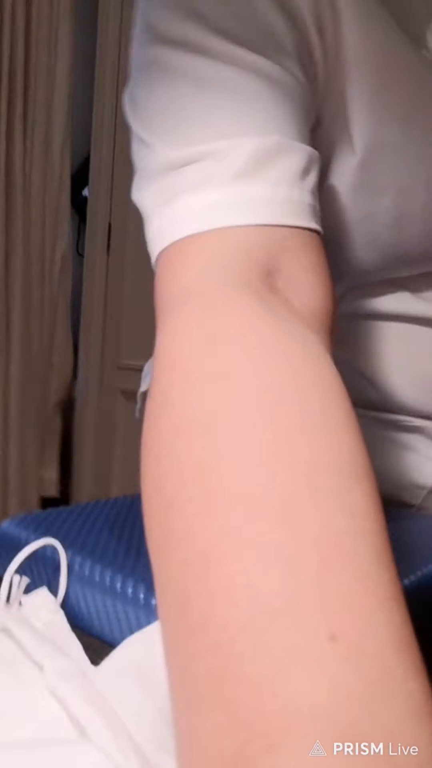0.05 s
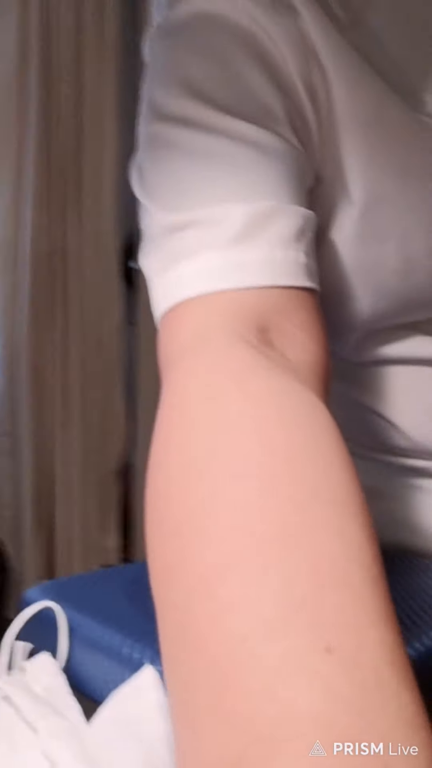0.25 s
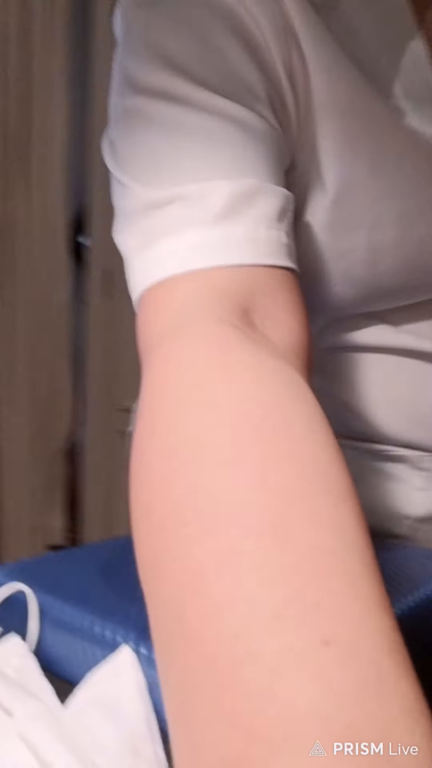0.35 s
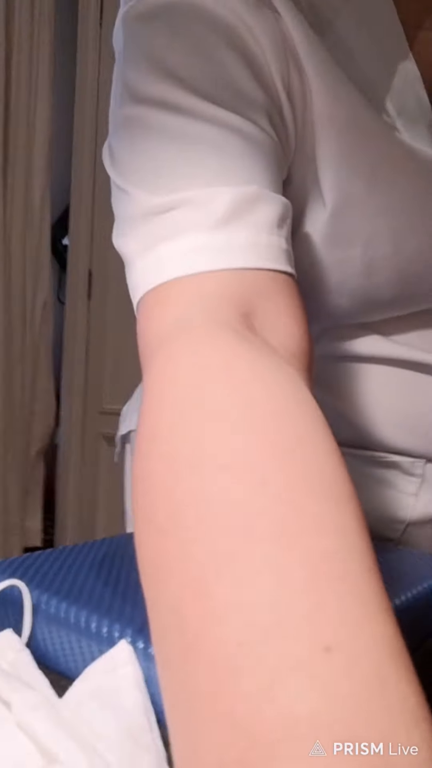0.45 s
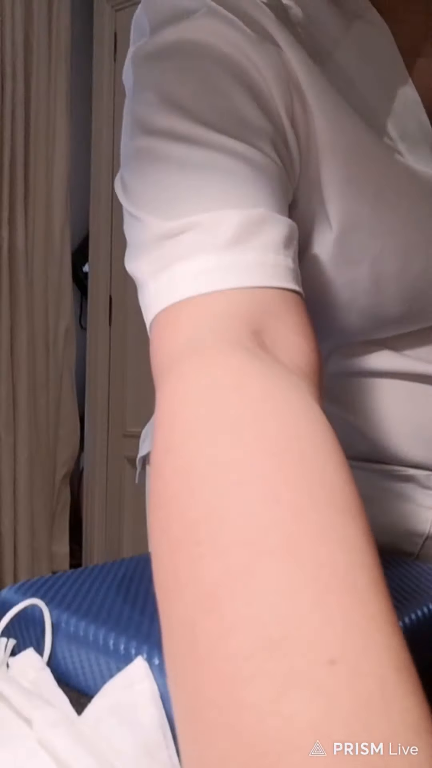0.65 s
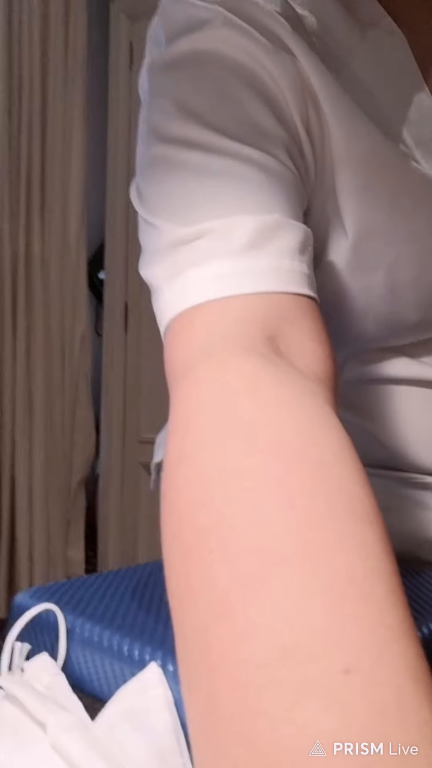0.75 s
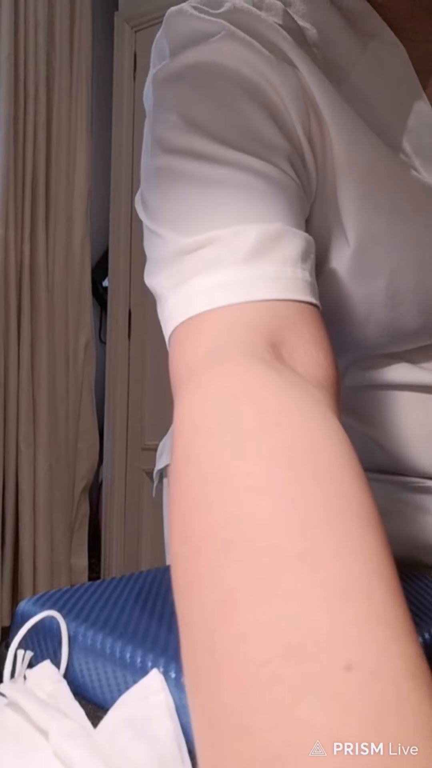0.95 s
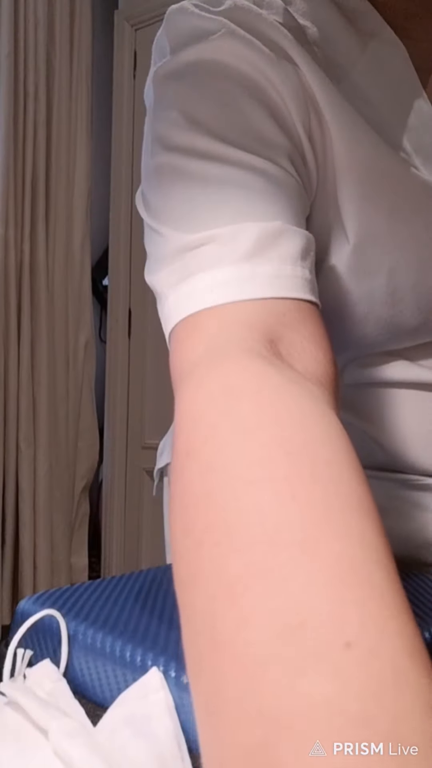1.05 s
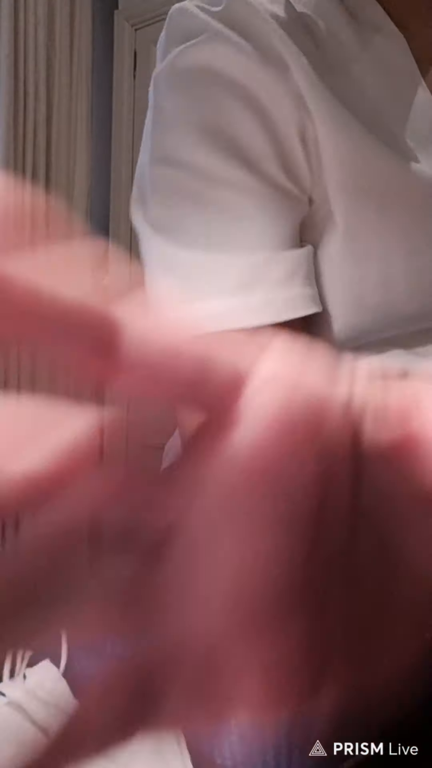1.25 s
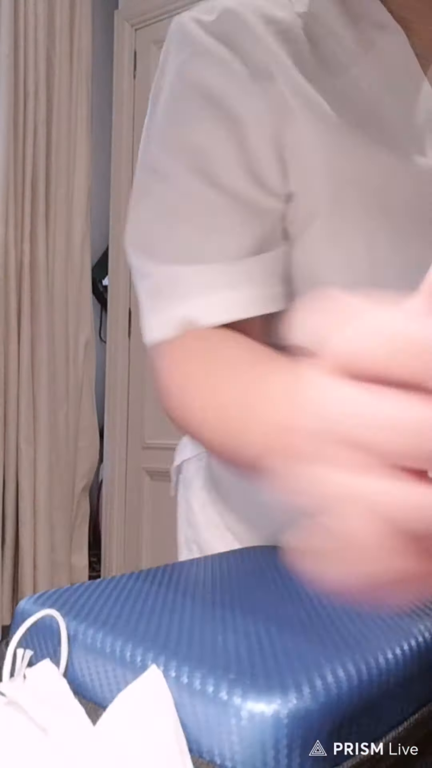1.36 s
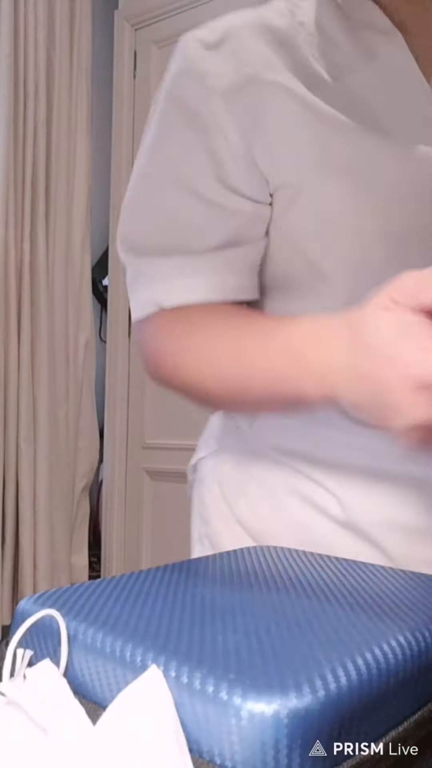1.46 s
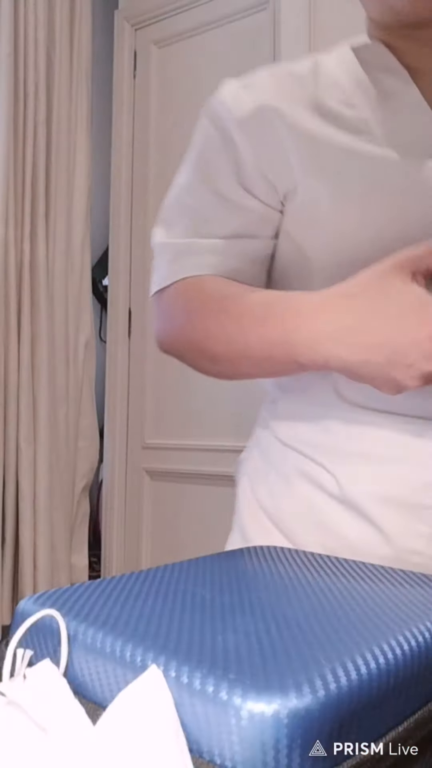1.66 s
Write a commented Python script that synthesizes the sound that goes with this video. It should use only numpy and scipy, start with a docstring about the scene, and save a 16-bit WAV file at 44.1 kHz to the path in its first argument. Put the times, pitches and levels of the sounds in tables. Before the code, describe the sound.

Handling noise in a quiet bedroom, very close stereo microphone. Faint touches, then at 0.14 s a violent overloaded knock with a crack, brief high squeak and faint metallic ring. From 0.2 to 0.6 s low rumble, skin rubbing and dry ticks, mostly left, with a short scrape near 0.44. A weaker clunk at 0.72, slight cloth rustle at 0.83, then hush with hiss, tiny ticks and soft hand pats around 1.53.

```python
"""Handling noise in a quiet bedroom

A hand adjusts a camera on its metal stand. Bumps excite damped modes of the casing and, faintly, of the stand;
fingers slide and tick beside the left microphone port as grainy noise and short resonances.
The grip lets go with a snap, clothes rustle as shaped noise while the arm draws back,
and the hands meet in a few light pats, decaying noise bursts. Low hum and hiss lie beneath.
"""
import sys
import numpy as np
from scipy.fft import rfft, irfft, next_fast_len
from scipy.io import wavfile
from scipy.ndimage import map_coordinates

SR = 44100
rng = np.random.default_rng(int(sys.argv[2]) if len(sys.argv) > 2 else 0)


def wrap_up_sound(samples):
    """Save the sound to the file named by the first command line argument, as 16-bit audio."""
    columns = np.atleast_2d(samples).T
    # keep every value between -1 and 1, then stretch to whole-number steps
    tamed = np.clip(columns, -1, 1)
    steps = np.round(tamed * 32767).astype(np.int16)
    wavfile.write(sys.argv[1], SR, steps)


N = 74970

# All levels are relative; pan_db is left minus right.
# Bumps on the casing: start_s, level_db, contact_ms (centre to peak of the push), pan_db
CASING_BUMPS = [(0.015, -39, 1.1, 18), (.081, -31, 0.51, 0.5), (0.14, 1, 0.73, 11.5),
                (0.1548, -7.5, 0.97, 11), (.1625, -18.5, 0.75, 12), (0.2193, -27, 1.75, 15.5),
                (.229, -19, 1.27, 13.5), (.266, -29, 1.9, 16), (0.286, -31.5, 1.27, 18),
                (.399, -27.5, 1.82, 8), (0.415, -35.5, 0.97, -13.5), (.441, -29, 1.55, -7.5),
                (.468, -30, 1.37, -5.5), (0.588, -32, 1.97, 20.5), (.597, -31.5, 0.88, 2),
                (0.7258, -17.5, 1.05, -9.5), (0.733, -29, 2.5, 7), (.748, -37.5, 2.1, -30.5),
                (0.76, -31, 1.8, 8), (0.808, -41, 2.3, 6), (1.009, -47.5, 2.1, 18)]
# Modes of the casing in its clamp: pitch_hz, level_db, t60_s, pan_db
CASING_MODES = [(79.4, -22.5, 0.11, 3), (131, -19, 0.083, 5), (223.8, -17.5, 0.22, 2),
                (270, -21, 0.08, -0.5), (349.2, -10, 0.053, -3), (430.6, -11.5, .055, -8),
                (470, -18.5, 0.03, -4.5), (566.3, -22.5, 0.17, -0.5), (612, -17.5, 0.059, -18.5),
                (723, -13.5, 0.089, 6), (790, -25.5, 0.037, -13.5), (876, -20.5, .05, 0.5),
                (1036, -27.5, 0.067, 2.5), (1760, -13.5, 0.011, 2)]
# Cracks and rattles of the clamp: start_s, crack_db, crack_pan_db, rattle_db, rattle_pan_db
CLAMP_BLOWS = [(.1402, -9.5, 1.5, -35, -3.5), (0.7224, -12.5, -19.5, -30, -2.5)]
# Spectrum of crack and rattle: frequency_hz, level_db
RATTLE_SPECTRUM = [(300, -6.5), (1000, -1.5), (2000, 0), (3200, -4), (4500, -1.5), (6000, -2), (8500, 0),
                   (12000, -9), (16000, -12)]
# Jolts that ring the stand: start_s, level_db, most_excited_hz, spread_octaves
STAND_JOLTS = [(0.0, -45, 1740, 0.38), (0.142, -35.5, 1140, 0.28), (0.7252, -45, 2700, 1.05)]
# Modes of the stand: pitch_hz, level_db, t60_s, pan_db
STAND_MODES = [(735, 1, .16, 10), (1240, 2, 0.41, 5), (1504, -9.5, .3, 14), (1820, -15, 0.27, 10.5),
               (2232, -16.5, 0.32, 2.5), (2400, -15, 0.28, 8.5), (2703, -4, 0.19, 4),
               (2902, -14.5, 0.2, 4.5), (3680, -9, .2, 2), (4415, -17.5, 0.51, 1), (5200, -18, .12, -2),
               (7200, -10.5, 0.079, 0)]
# Ticks of skin and nail on the casing: start_s, level_db, centre_hz, pan_db, tail_db
SKIN_TICKS = [(.079, -36.5, 527, 12, -3), (.107, -45, 2880, 12.5, -8), (0.213, -26, 9600, 25, -19),
              (0.217, -24.5, 9400, 34.5, -21), (.286, -24, 4370, 11, -36), (0.321, -23, 9000, 14, -40),
              (0.331, -32, 10200, 12, -33), (0.3686, -26, 9300, 20, -29), (0.3924, -35, 9450, 33, -20),
              (.442, -20, 2400, 25.5, -22), (0.458, -25.5, 9000, 10, -19), (0.533, -46.5, 1920, 10, -15),
              (.5735, -31.5, 9050, 10.5, -30), (0.646, -30, 13500, 12.5, -39), (.651, -44.5, 517, -11, -16),
              (.675, -47, 510, -17, -14), (.7448, -34, 2580, -13, -7), (1.136, -42, 9130, 15, -23),
              (1.2384, -42.5, 8700, 7, -7), (1.421, -43.5, 9000, -8, -5.5), (1.5326, -38.5, 8550, 20, -33),
              (1.561, -37, 8500, 7, -31), (1.692, -33.5, 9150, 0, -26)]
# Finger strokes by the left port: start_s, length_s, level_db, slope_db_per_s, release_s
FINGER_STROKES = [(0.144, .008, -35, -100, 0.025), (0.206, 0.027, -25.5, -47, 0.0046),
                  (0.225, 0.0984, -28.5, -32, 0.0093), (0.355, 0.12, -33.5, -30, 0.011),
                  (0.483, 0.12, -49.5, -42, 0.012), (0.577, 0.023, -39.5, 42, 0.0057),
                  (0.69, 0.011, -50, 14, .006), (0.805, 0.037, -36, 92, 0.0086)]
# Spectrum of sliding skin: frequency_hz, level_db
SKIN_SPECTRUM = [(200, -0.5), (500, -8.5), (900, -28.5), (1800, -23.5), (3200, -16.5), (5500, -12),
                 (8800, 0), (12000, -9.5), (16000, -12.5)]
# The fingertip drags harder just before it slips: time_s, level_db
DRAG_LEVEL = [(.36, -95), (.39, -70), (.42, -55), (.44, -46.5), (.455, -59), (.52, -84), (.58, -110)]
# Spectrum of the drag: frequency_hz, level_db
DRAG_SPECTRUM = [(400, -20), (1000, -3), (1900, -1), (2900, -3), (4500, -10.5), (9000, -24)]
# Rumble of the holding hand: time_s, level_db, pan_db
GRIP_LEVEL = [(0, -56, 18), (.11, -60.5, 15), (.2, -35, -1), (.29, -37, 13), (.35, -50.5, 7),
              (0.419, -41.5, 10), (.48, -41.5, 3), (.54, -52, 5.5), (.61, -44.5, 12), (.68, -59.5, 19),
              (.83, -54.5, 10), (.92, -61.5, 12), (1.1, -71, 1.5), (1.7, -77.5, -2)]
# Spectrum of the rumble: frequency_hz, level_db
RUMBLE_SPECTRUM = [(20, -13.5), (45, -1.5), (120, 1), (260, -4), (380, -14), (600, -30.5), (900, -31),
                   (1500, -37), (4000, -50.5)]
# Rustle of the shirt: time_s, level_db
SLEEVE_LEVEL = [(0, -60), (.65, -62.5), (.79, -60), (.83, -45.5), (.875, -57), (.92, -62), (1.05, -67.5),
                (1.33, -67), (1.43, -60.5), (1.52, -58), (1.57, -57), (1.63, -63), (1.7, -68.5)]
# Spectrum of the cloth: frequency_hz, level_db
CLOTH_SPECTRUM = [(100, -13.5), (400, 5), (900, -1.5), (2000, -10), (4500, -5.5), (7000, -4), (8800, 1),
                  (12000, -11), (16000, -10.5)]
# Soft pats of the hands: start_s, level_db, pan_db
HAND_PATS = [(0.823, -61, 18), (0.871, -54.5, 22), (1.421, -72, -3), (1.531, -42.5, 5), (1.553, -46.5, 8),
             (1.56, -49, -7)]
# Spectrum of the palms: frequency_hz, level_db
PALM_SPECTRUM = [(100, -1), (400, 4.5), (800, 1), (1400, -5), (2500, -7.5), (4000, -22), (6500, -23),
                 (8600, -1.5), (11000, -13), (16000, -16)]
# Spectrum of the low room tone: frequency_hz, level_db
HUM_SPECTRUM = [(12, -47.5), (20, -11.5), (75, 0), (120, -6.5), (146, -23.5), (188, -0.5), (213, -12),
                (275, -9), (416, -21.5), (464, -30.5), (1500, -37.5), (1950, -61), (3300, -120)]
# Narrow bands of room hum: centre_hz, wobble_knots_per_s (sets the width), level_db
HUM_BANDS = [(112, 4.7, -71.5), (195, 17, -70), (273, 7.3, -70.5)]
# Spectrum of the microphone hiss: frequency_hz, level_db
HISS_SPECTRUM = [(710, -39.5), (1200, -13.5), (2560, -16.5), (2950, -18), (3400, -15.5), (5300, -14.5),
                 (5970, -13), (8630, -3), (16000, -13)]
# Slow changes of the hiss: time_s, level_db
HISS_LEVEL = [(0, 0.5), (.6, 6.5), (.78, -22), (.9, 1), (1.05, -1.5), (1.2, 3.5), (1.28, -0.5), (1.55, 7.5),
              (1.66, -3)]

CASING_DB, SOFT_HZ_MS = -3.5, 351.9  # ring against push; corner frequency times contact time
PORT_LAG_S, MODE_LAG_RAD = 0.00031, 0.6  # the right port moves a little after the left
RATTLE_DECAY_S = 0.018
SQUEAK_S, SQUEAK_HZ, SQUEAK_DB, SQUEAK_RISE_S = 0.14, 8205, 4, 0.00044
SQUEAK_BEND = 0.13  # share of its pitch by which the squeak starts high
TICK_BANDWIDTH = 0.395  # share of the centre frequency
CRACK_S, GRIT_S = 0.0003, 0.003  # decay times
STROKE_ATTACK_S, STROKE_LEAK_DB = 0.0064, -20.5  # leak: level at the right port
GRAINS_PER_S, GRAIN_SHARE = 2100, 0.65
PAT_DECAY_S, ROOM_DECAY_S, ROOM_GAIN = 0.0046, 0.016, 0.238265
HUM_DB, HISS_DB, HISS_PAN_DB = -62, -62, 5
CLIP_LEVEL, TOP_HZ = 0.9, 16050  # output ceiling; upper band limit


def amp(db):
    """Decibel law: gain is ten to the level over twenty."""
    return 10 ** (np.asarray(db) / 20)


def unit(x):
    """Normalisation by the root mean square."""
    return x / np.sqrt(np.mean(x ** 2) + 1e-20)


def since(s):
    """Elapsed time: seconds since s, zero before it."""
    return np.maximum(np.arange(N) / SR - s, 0)


def decay(s, life):
    """Exponential decay that starts at s, with time constant life."""
    return (since(s) > 0) * np.exp(-since(s) / life)


def sides(db):
    """Level difference between the ears, split evenly into left and right gains."""
    return amp(np.array([[db], [-db]]) / 2)


def curve(rows):
    """Envelope: gain per sample, linear in decibels between (s, dB) points."""
    return amp(np.interp(np.arange(N) / SR, *np.transpose(rows)))


def filtered(x, response):
    """Linear filtering: the spectrum of x times a response of frequency."""
    m = next_fast_len(N + SR // 2)
    spectrum = rfft(x, m) * response(np.fft.rfftfreq(m, 1 / SR))
    return irfft(spectrum, m)[..., :N]


def coloured(x, points):
    """Spectral shaping of x by (Hz, dB) points, at rms 1."""
    f, db = np.transpose(points)
    return unit(filtered(x, lambda hz: amp(np.interp(np.log(hz + 1), np.log(f + 1), db))))


def noise(points, shared):
    """Partial coherence: stereo noise whose shared power is common to both ports."""
    z = rng.standard_normal((3, N))
    return coloured(np.sqrt(shared) * z[2] + np.sqrt(1 - shared) * z[:2], points)


def wobble(rate):
    """Slow fluctuation: a smooth random curve with rate knots a second."""
    knots = rng.standard_normal(int(N * rate / SR) + 4)
    return map_coordinates(knots, [np.arange(N) * rate / SR])


def ring(s, hz, t60):
    """Damped oscillation of one mode struck at s."""
    return amp(-60 * since(s) / t60) * np.sin(2 * np.pi * hz * since(s))


def bumps():
    """Impact excitation: a push out and back rings the casing; longer contact excites less treble."""
    out = np.zeros((2, N + SR))
    t = np.arange(SR // 5) / SR
    right = np.array([[0], [1]])
    modes = []
    for hz, db, t60, pan in CASING_MODES:
        lag = right * MODE_LAG_RAD * np.minimum(hz * t, 1)  # builds up over the first cycle
        wave = np.sin(2 * np.pi * hz * t - lag)
        modes.append((hz, amp(db - 60 * t / t60) * sides(pan) * wave))
    for s, db, contact_ms, pan in CASING_BUMPS:
        u = (np.arange(N) / SR - s - right * PORT_LAG_S) * 1000 / contact_ms
        push = u * np.exp((1 - u * u) / 2)
        body = sum(mode / np.hypot(1, hz * contact_ms / SOFT_HZ_MS) for hz, mode in modes)
        out[:, :N] += amp(db) * sides(pan) * push
        out[:, round(s * SR):][:, :len(t)] += amp(db + CASING_DB) * sides(pan) * body
    return out[:, :N]


def clamp():
    """Impulse and scatter: each sharp blow gives one crack, then a brief bright rattle."""
    out = np.zeros((2, N))
    for s, crack_db, crack_pan, rattle_db, rattle_pan in CLAMP_BLOWS:
        impulse = 1.0 * (np.arange(N) == round(s * SR))
        crack = coloured(impulse, RATTLE_SPECTRUM)
        rattle = decay(s, RATTLE_DECAY_S) * noise(RATTLE_SPECTRUM, shared=0.037)
        out += amp(rattle_db) * sides(rattle_pan) * rattle
        out -= amp(crack_db) * sides(crack_pan) * crack / crack.max()
    return out


def stand():
    """Modal ringing: the metal stand sounds on after a jolt, which favours one region of its modes."""
    out = np.zeros((2, N))
    for s, level, centre, spread in STAND_JOLTS:
        for hz, db, t60, pan in STAND_MODES:
            favour = 1 / (1 + (np.log2(hz / centre) / spread) ** 4)
            out += amp(level + db) * favour * sides(pan) * ring(s, hz, t60)
    return out


def squeak():
    """Cavity resonance: air squeezed through the right port rings it briefly; the pitch falls into place."""
    t = since(SQUEAK_S)
    u = t / SQUEAK_RISE_S
    cycles = SQUEAK_HZ * (t + SQUEAK_BEND * SQUEAK_RISE_S * (1 - np.exp(-u)))
    return amp([[SQUEAK_DB - 25], [SQUEAK_DB]]) * u * np.exp(1 - u) * np.sin(2 * np.pi * cycles)


def ticks():
    """Heavily damped resonance: tiny contacts with a broad resonance, a crack and a short gritty tail."""
    out = np.zeros((2, N))
    for s, db, hz, pan, tail_db in SKIN_TICKS:
        t = since(s)
        snap = np.exp(-np.pi * hz * TICK_BANDWIDTH * t) * np.sin(2 * np.pi * hz * t)
        spectrum = [(hz / 8, -18), (hz / 2, -4), (hz, 0), (hz * 2, -9), (hz * 8, -26)]
        grit_level = 0.2 * decay(s, CRACK_S) + amp(tail_db) * decay(s, GRIT_S)
        out += amp(db) * sides(pan) * (noise(spectrum, shared=0.41) * grit_level - snap)
    return out


def fingers():
    """Stick-slip friction: skin slides in tiny random slips, coloured by the port's cavity."""
    level = np.zeros(N)
    for s, length, db, slope, release in FINGER_STROKES:
        held = amp(db + slope * np.minimum(since(s), length))
        attack = np.minimum(since(s) / STROKE_ATTACK_S, 1)
        level += held * attack * np.exp(-since(s + length) / release)
    slips = unit((rng.random((2, N)) < GRAINS_PER_S / SR) * rng.standard_normal((2, N)))
    smooth = rng.standard_normal((2, N))
    rub = coloured(GRAIN_SHARE * slips + (1 - GRAIN_SHARE) * smooth, SKIN_SPECTRUM)
    return amp([[0], [STROKE_LEAK_DB]]) * level * amp(1.1 * wobble(130)) * rub


def drag():
    """Dry friction: an uneven mid-pitched scrape beside the left port."""
    return sides(18.5) * curve(DRAG_LEVEL) * amp(1.9 * wobble(180)) * noise(DRAG_SPECTRUM, shared=0.3)


def grip():
    """Structure-borne sound: the holding hand makes the casing rumble, mostly at the port it covers."""
    s, db, pan = np.transpose(GRIP_LEVEL)
    level = np.array([curve(np.transpose([s, db + side * pan / 2])) for side in (1, -1)])
    return level * noise(RUMBLE_SPECTRUM, shared=0.94)


def sleeve():
    """Fabric friction: cloth rustles unevenly as the arm moves."""
    return sides(1) * curve(SLEEVE_LEVEL) * amp(wobble(110)) * noise(CLOTH_SPECTRUM, shared=0.33)


def pats():
    """Direct and reflected sound: soft contacts a little way off, with the bedroom's short answer."""
    level = np.zeros((2, N))
    for s, db, pan in HAND_PATS:
        direct_and_room = decay(s, PAT_DECAY_S) + ROOM_GAIN * decay(s, ROOM_DECAY_S)
        level += amp(db) * sides(pan) * direct_and_room
    return level * noise(PALM_SPECTRUM, shared=1.0)


def room():
    """Background noise: low room tone with a wavering narrow-band hum, and the microphones' hiss."""
    phase = 2 * np.pi * np.arange(N) / SR
    drone = np.zeros(N)
    for hz, rate, db in HUM_BANDS:
        drone += amp(db) * (wobble(rate) * np.sin(hz * phase) + wobble(rate) * np.cos(hz * phase))
    tone = amp(HUM_DB) * noise(HUM_SPECTRUM, shared=0.91)
    hiss = curve(HISS_LEVEL) * sides(HISS_PAN_DB) * noise(HISS_SPECTRUM, shared=0.05)
    return drone + tone + amp(HISS_DB) * hiss


def scene():
    """Superposition: handling noise over the quiet room."""
    handling = bumps() + clamp() + stand() + squeak() + ticks() + fingers() + drag() + grip()
    return handling + sleeve() + pats() + room()


def record(dry):
    """Saturation and band limiting: the hardest bump overloads the input; the extreme treble is cut."""
    # Quiet sound passes at a gain of about 0.77; loud peaks level off at the ceiling.
    clipped = dry / (14.5 + np.abs(dry / CLIP_LEVEL) ** 10) ** (1 / 10)
    return filtered(clipped, lambda hz: 1 / (1 + (hz / TOP_HZ) ** 120))


dry = scene()
out = record(dry)
wrap_up_sound(out)
```